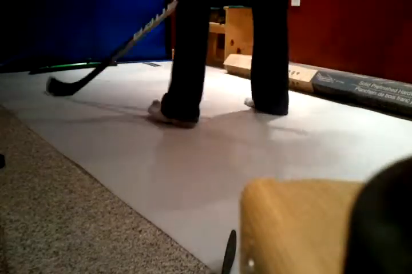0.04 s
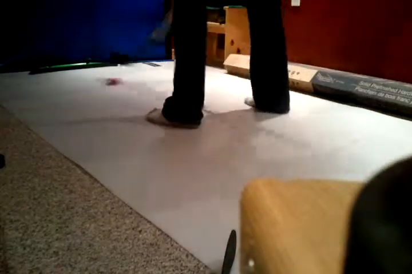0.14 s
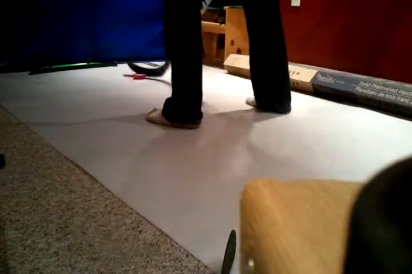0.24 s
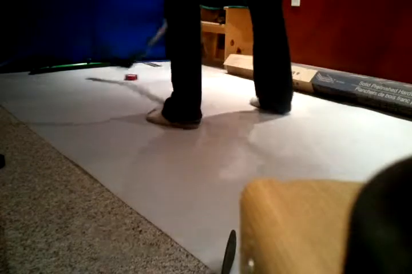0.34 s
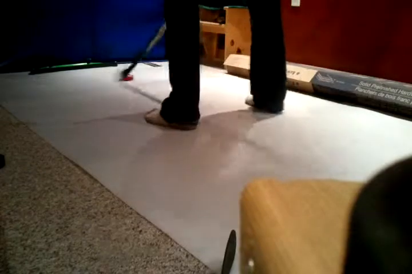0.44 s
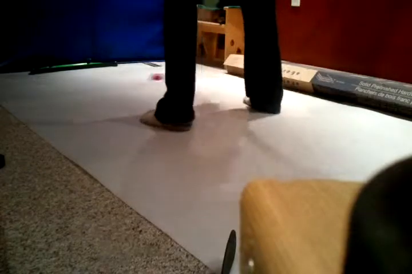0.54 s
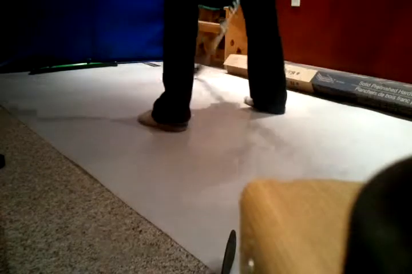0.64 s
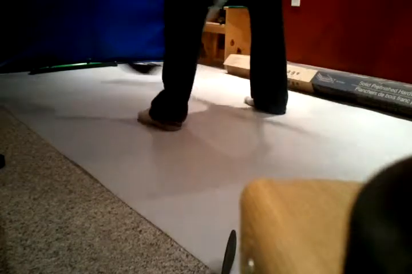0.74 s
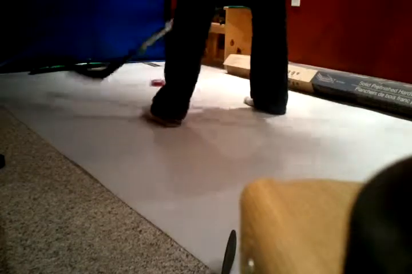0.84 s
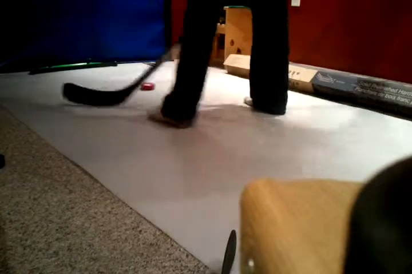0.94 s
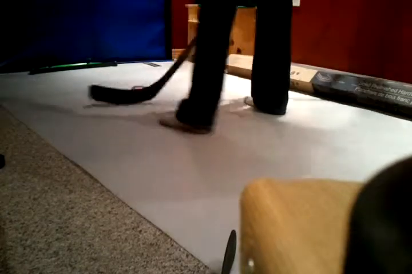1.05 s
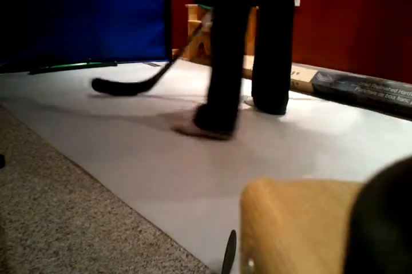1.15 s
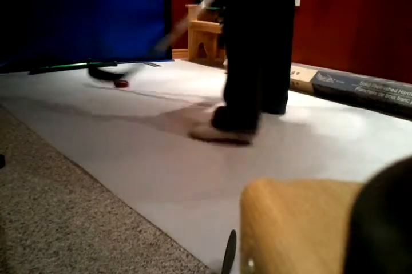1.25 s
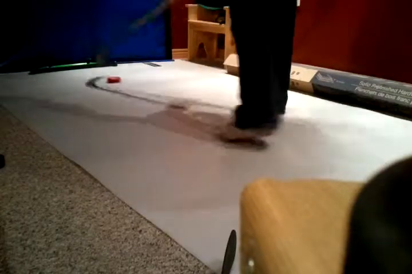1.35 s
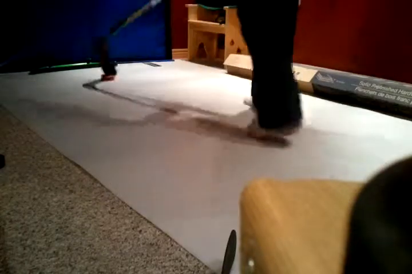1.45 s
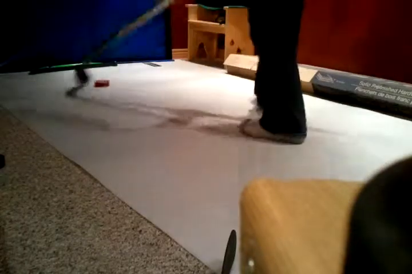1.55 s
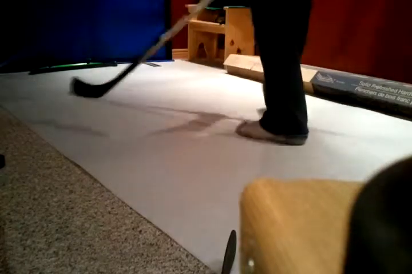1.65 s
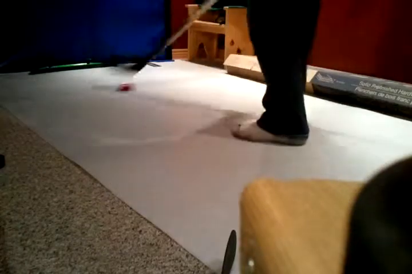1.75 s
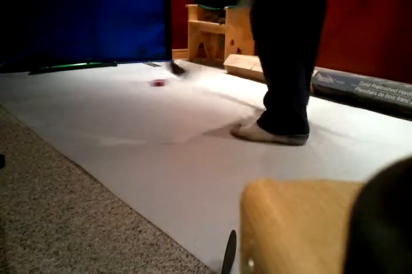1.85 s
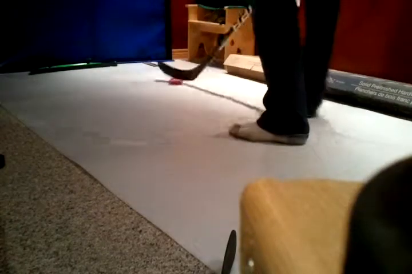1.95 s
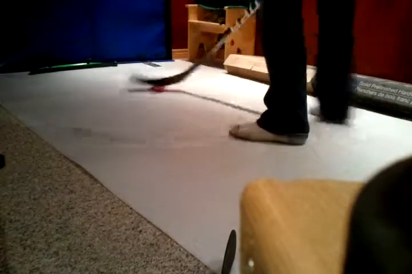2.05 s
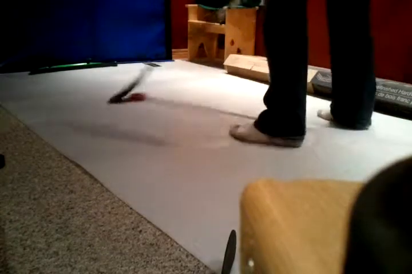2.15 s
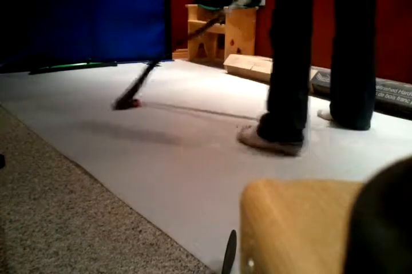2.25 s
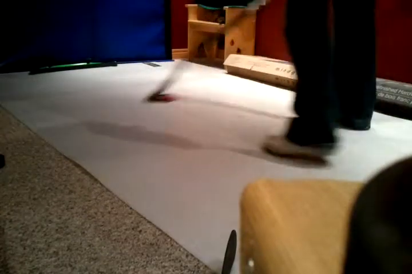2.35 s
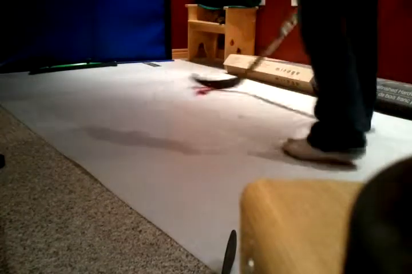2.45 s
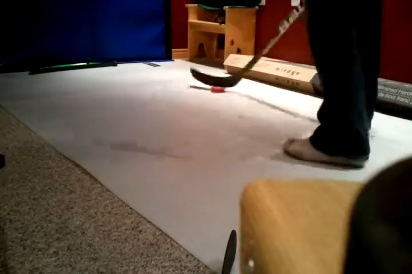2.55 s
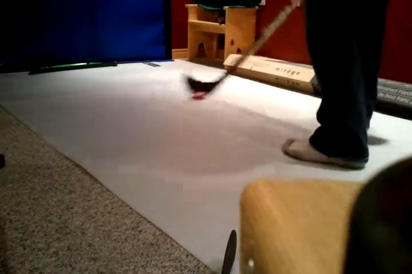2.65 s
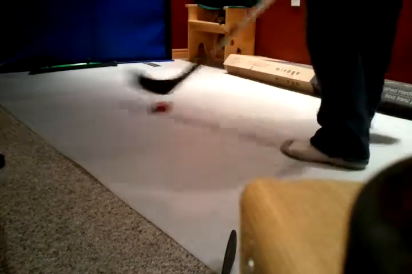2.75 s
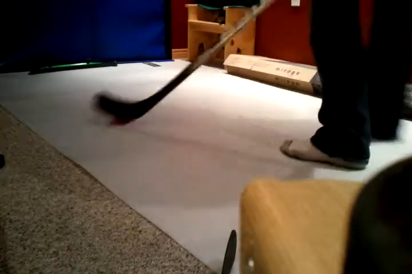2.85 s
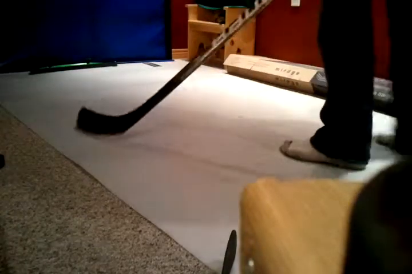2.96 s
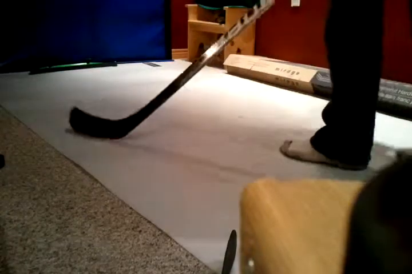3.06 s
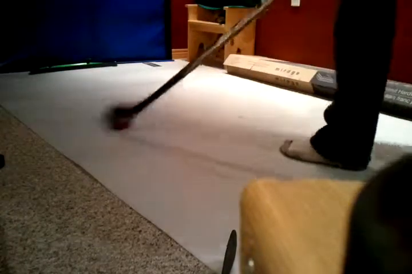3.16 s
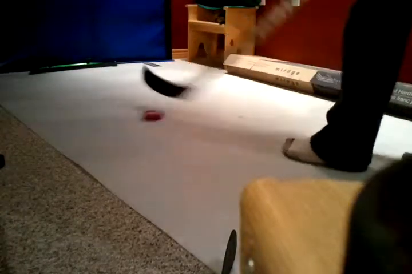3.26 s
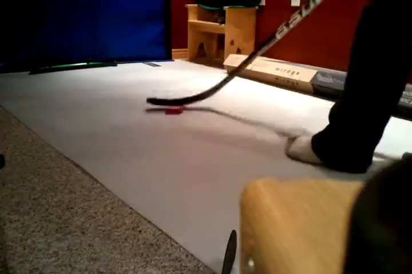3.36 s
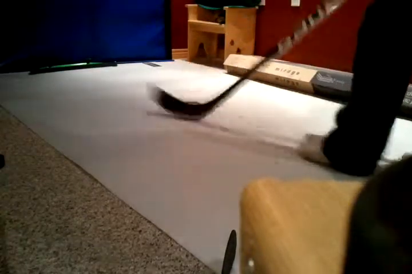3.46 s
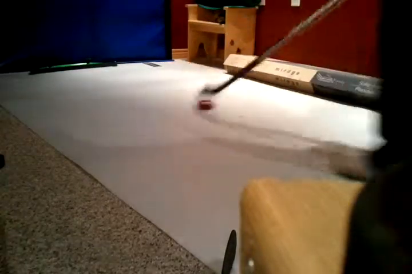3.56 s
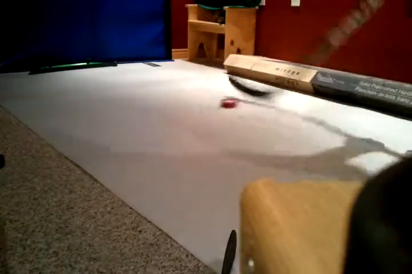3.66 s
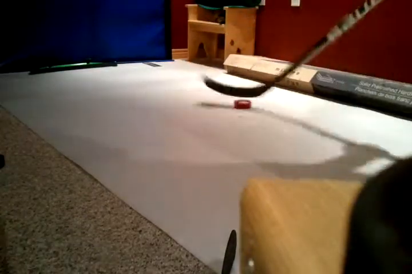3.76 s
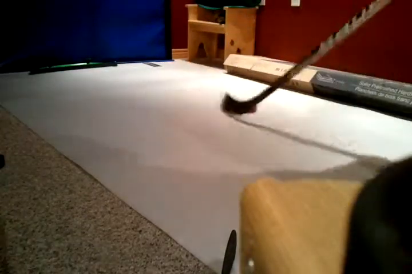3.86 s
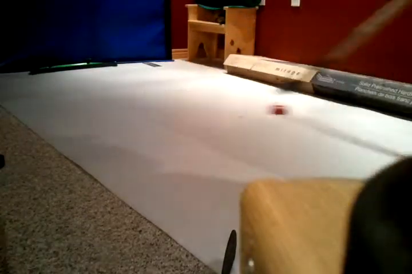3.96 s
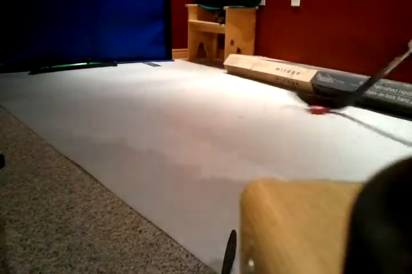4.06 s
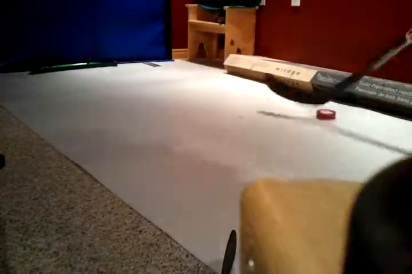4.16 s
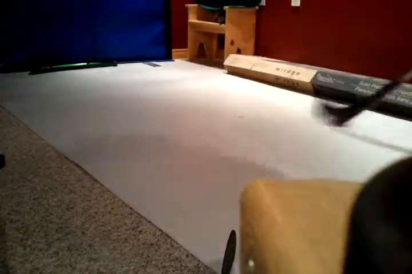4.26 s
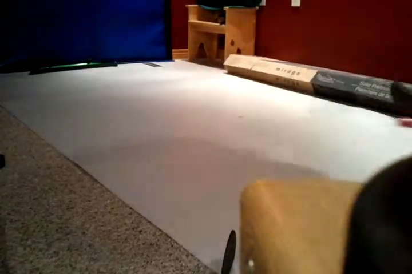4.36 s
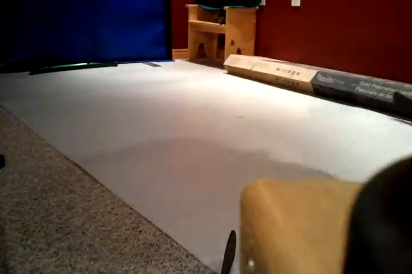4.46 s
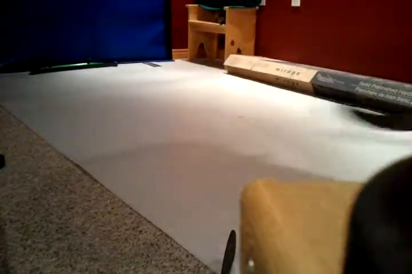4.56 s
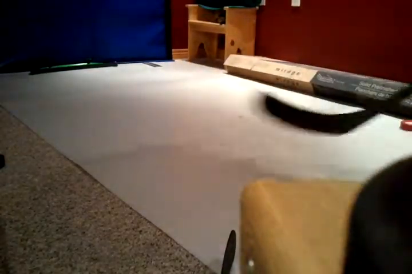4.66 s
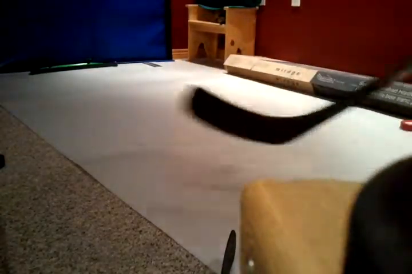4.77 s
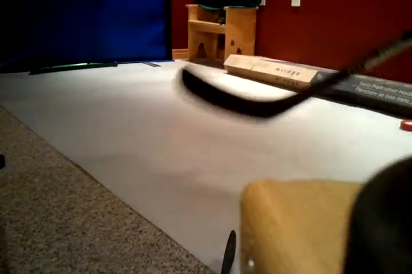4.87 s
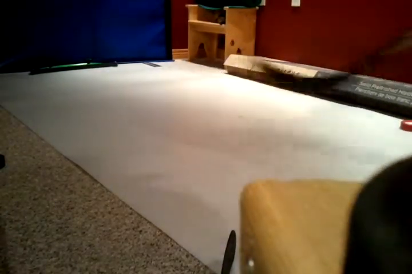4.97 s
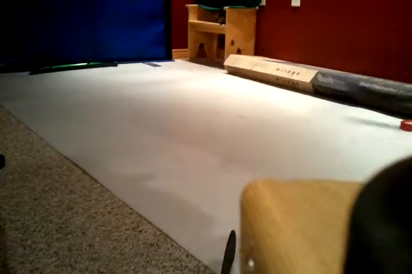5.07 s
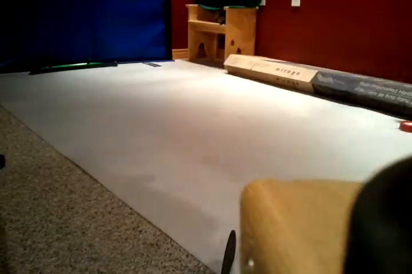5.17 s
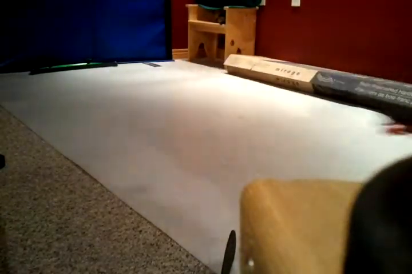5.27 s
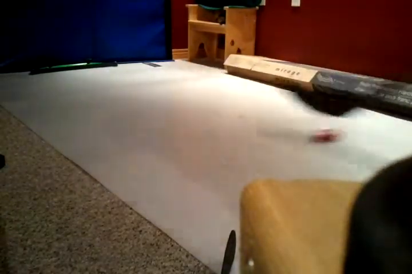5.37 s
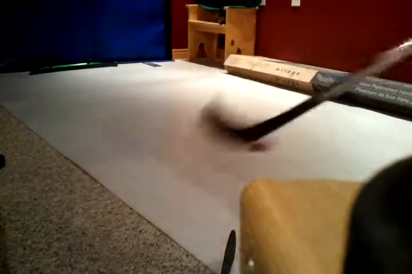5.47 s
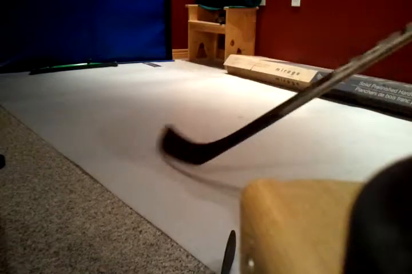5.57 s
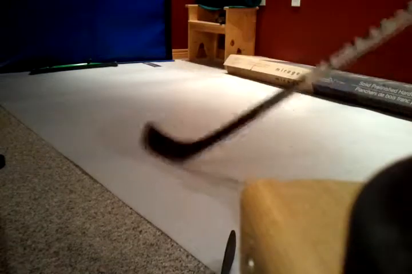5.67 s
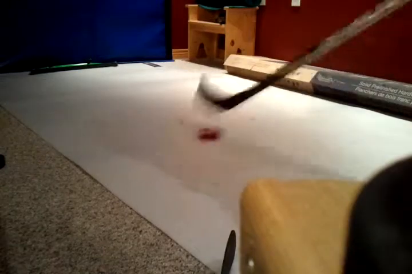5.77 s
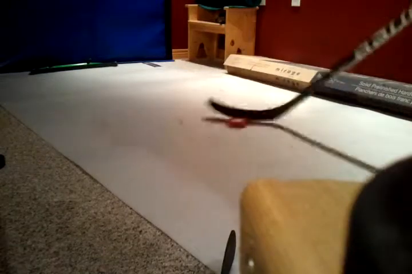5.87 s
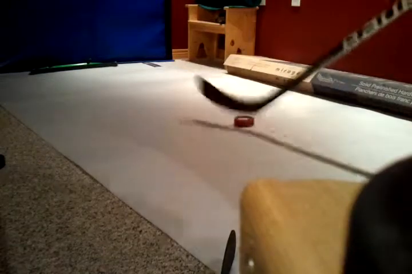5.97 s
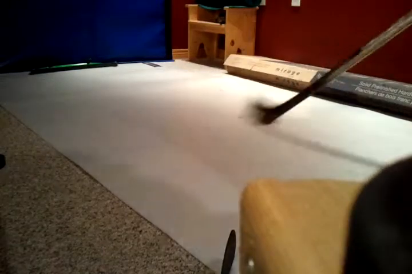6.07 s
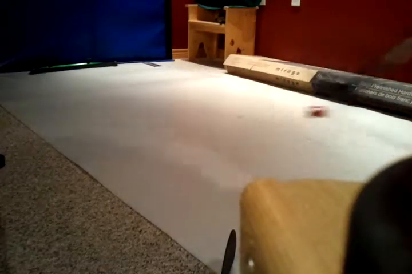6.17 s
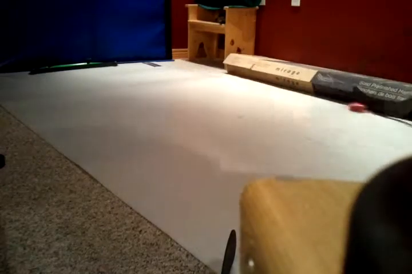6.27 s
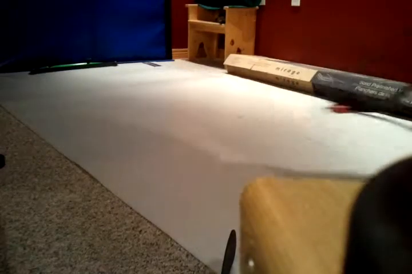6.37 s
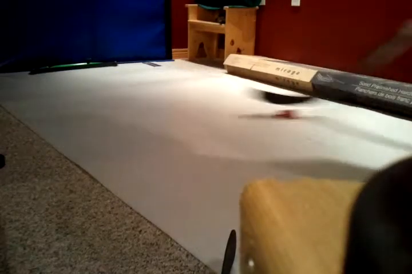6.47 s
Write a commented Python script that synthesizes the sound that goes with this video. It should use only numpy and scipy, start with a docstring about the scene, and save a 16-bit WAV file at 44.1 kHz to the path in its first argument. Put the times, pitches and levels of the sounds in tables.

```python
"""Stickhandling on a plastic shooting pad in a small, quiet basement room. From the start the blade thumps down
on the pad and clacks against the hard puck, which slides with a faint friction hiss. After two seconds hollow
knocks join in. Near five seconds it rests while the blade scrapes; then play resumes, and a loud knock ends it.
Throughout, the room reverberates after every blow, and the hardest ones overload a small microphone."""
import sys
import numpy as np
from scipy import signal
from scipy.fft import rfft, irfft
from scipy.io import wavfile
from scipy.ndimage import uniform_filter1d

SR = 44100
rng = np.random.default_rng(int(sys.argv[2]) if len(sys.argv) > 2 else 0)


def to_wav(sig):
    """Store sig (one row per channel, or 1-D mono) as 16-bit WAV at the path in sys.argv[1].

    Samples outside -1..1 are clipped; the rate is SR.
    """
    pcm = np.clip(np.atleast_2d(sig), -1, 1) * 32767
    pcm = np.round(pcm).astype(np.int16)
    wavfile.write(sys.argv[1], SR, pcm.T)  # frames by channels


N = 287973
BLOW_SAMPLES = 2 ** 15   # time for one blow to die away

# Spectral envelope of the taps and knocks. Each row: frequency in Hz, level in dB.
PAD_COLOUR = [(40, -13.5), (110, -8.5), (160, 9), (210, 11.5), (320, 11.5), (600, 4), (900, 1), (1800, 3.5),
              (3100, -1.5), (4200, 5), (5500, 5), (6600, -4.5), (8000, -10.5)]


def from_db(db):
    """Amplitude ratio: tenfold for every 20 dB."""
    return 10 ** (np.asarray(db) / 20)


def at_hz(points, hz):
    """Interpolation of (Hz, value) points on a logarithmic frequency axis."""
    frequencies, values = np.transpose(points)
    return np.interp(np.log(np.maximum(hz, 1)), np.log(frequencies), values)


def bins_hz(size):
    """Fourier analysis: the frequencies of a real FFT."""
    return np.arange(size // 2 + 1) * SR / size


def resonance(hz, centre, width):
    """Lorentzian resonance curve, 1 at its centre."""
    return 1 / (1 + (2 * (hz - centre) / width) ** 2)


def causal_filter(db):
    """Causality: a minimum-phase response of this shape and unit power gain, so nothing sounds early."""
    gain = from_db(db)
    cepstrum = irfft(np.log(gain / np.sqrt(np.mean(gain ** 2))))
    half = len(cepstrum) // 2
    cepstrum[1:half] *= 2
    cepstrum[half + 1:] = 0
    return np.exp(rfft(cepstrum))


def treble_loss(hz, edge_hz=7990, db_per_octave=170, depth_db=60):
    """Band limiting, in dB: the small microphone is nearly deaf above its edge."""
    return -np.minimum(db_per_octave * np.log2(np.maximum(hz / edge_hz, 1)), depth_db)


def steady_noise(colour):
    """Spectral shaping: white noise filtered to a given colour, rms 1."""
    hz = bins_hz(N)
    gain = from_db(at_hz(colour, hz) + treble_loss(hz))
    noise = irfft(rfft(rng.standard_normal(N)) * gain, N)
    return noise / np.std(noise)


def room_air(level_db=-46):
    """Ambient noise: the steady, low rush of a quiet room."""
    # Spectrum of the room's noise. Each row: frequency in Hz, level in dB.
    colour = [(15, -69), (25, -36), (114, -1), (266, -4.5), (300, -8), (382, -9), (590, -11.5), (635, -15),
              (1190, -21), (3280, -32), (5060, -27), (8000, -44), (10400, -68), (17600, -120)]
    return from_db(level_db) * steady_noise(colour)


def room_decay():
    """Absorption: overlapping frequency bands, and the exponential decay of each."""
    # Reverberation of the room. Each row: frequency in Hz, time to fall 60 dB in seconds.
    reverberation = [(100, 0.29), (220, 0.31), (500, 0.24), (1000, 0.22), (1800, 0.23), (3200, 0.25),
                     (5300, 0.25), (7500, 0.2)]
    t, hz = np.arange(BLOW_SAMPLES) / SR, bins_hz(BLOW_SAMPLES)
    centres, t60s = np.transpose(reverberation)
    bands = np.array([at_hz(np.c_[centres, row], hz) for row in np.eye(len(centres))])
    return bands, from_db(-60 * t / t60s[:, None])


def sliding(slide_db=-44.5, rest_from_s=4.92, rest_until_s=5.45, fade_s=0.2, grain_db=0.5):
    """Friction noise: the puck hisses over the scuffed pad unless at rest, and the blade scrapes."""
    # Spectrum of rubbing plastic. Each row: frequency in Hz, level in dB.
    colour = [(200, -22.5), (330, -13), (600, -6), (1000, -5.5), (2000, -9), (2800, -10.5), (3700, -11),
              (4700, -3.5), (5450, -1), (6300, -11), (8000, -17.5)]
    # Scrapes of the blade. Each row: midpoint in seconds, half length in seconds, level in dB.
    strokes = [(5.06, 0.14, -48.5), (5.16, 0.021, -47), (5.673, 0.042, -36)]
    t = np.arange(N) / SR
    moving = np.clip(np.maximum(rest_from_s - t, t - rest_until_s) / fade_s, 0, 1)
    scrapes = sum(from_db(db) * np.exp(-((t - s) / half_s) ** 2) for s, half_s, db in strokes)
    scuffs = uniform_filter1d(rng.standard_normal(N), size=300)
    grain = from_db(grain_db * scuffs / np.std(scuffs))
    return (from_db(slide_db) * moving + scrapes) * grain * steady_noise(colour)


def floor_thuds(taps, gain_db=2, reach_hz=60):
    """Free vibration: each tap sets the floor humming, favouring the modes near the pitch of its thump."""
    # Modes of the padded floor. Each row: frequency in Hz, time to fall 60 dB in seconds, level in dB.
    floor_modes = [(199.6, 0.42, -11), (249.2, 0.16, -11.5), (297, 0.34, -35)]
    out, t = np.zeros(N + BLOW_SAMPLES), np.arange(BLOW_SAMPLES) / SR
    for s, level_db, flat_db, thump_hz in taps:
        hum = sum(resonance(hz, thump_hz, reach_hz) * from_db(db - 60 * t / t60)
                  * np.cos(2 * np.pi * hz * t) for hz, t60, db in floor_modes)
        start = round(s * SR)
        out[start:start + BLOW_SAMPLES] += from_db(level_db + flat_db + gain_db) * hum
    return out[:N]


def snap_gain(s, level_db, room_radius_m=2.05):
    """Direct-to-reverberant ratio, in dB: light blows and near ones stand out more crisply."""
    # Path of the blade. Each row: time in seconds, distance from the microphone in metres.
    distances = [(0, 2.53), (2.1, 2.43), (3.0, 2), (3.55, 1.83), (4.15, 2.27), (4.55, 1.78), (5.5, 1.8),
                 (5.9, 2.05), (6.5, 2)]
    metres = np.interp(s, *np.transpose(distances))
    lightness_db = min(-0.52 * level_db, 9.5)
    return lightness_db + 20 * np.log10(room_radius_m / metres)


def contact(snap_db, decay, snap_s, rise_s=0.00039, echo_s=0.0085, echo_db=2, echo_decay_s=0.0087,
            build_s=0.0048, early_s=0.19):
    """Spectrum of an impact: direct burst, ceiling echo and diffuse reflections add in power and decay."""
    t = np.arange(BLOW_SAMPLES) / SR
    bands, envelopes = decay
    direct = from_db(snap_db) * np.exp(-t / snap_s) * (1 - np.exp(-t / rise_s))
    ceiling = from_db(echo_db) * (t > echo_s) * np.exp(-np.abs(t - echo_s) / echo_decay_s)
    bunches = uniform_filter1d(rng.standard_normal(BLOW_SAMPLES), size=60)   # early echoes cluster
    diffuse = (1 - np.exp(-t / build_s)) * from_db(bunches / np.std(bunches) * np.exp(-t / early_s))
    burst = rng.standard_normal(BLOW_SAMPLES) * np.sqrt(direct ** 2 + ceiling ** 2 + diffuse ** 2)
    return rfft(np.sum(irfft(rfft(burst) * bands) * envelopes, axis=0))


def uneven_modes(hz, spread_db=1.8):
    """Point of excitation: no two blows hit the same spot, so the upper modes vary at random, in dB."""
    ripple = uniform_filter1d(rng.standard_normal(len(hz)), size=110)
    ripple = uniform_filter1d(ripple, size=110)
    return spread_db * ripple / np.std(ripple) * at_hz([(400, 0), (1000, 1)], hz)


def tilt(hz, thump_db, body_db, slap_db):
    """Spectral balance, in dB: bass, low middle and treble against the blade's woody middle."""
    balance = [(290, thump_db), (520, body_db), (950, body_db), (1500, 0), (2400, 0.012), (3800, slap_db)]
    return at_hz(balance, hz)


def blows(events, colour, tone, crack_db, snap_s, gain_db):
    """Source and filter: each impact excites the modes of stick and puck; its landing sets the tone."""
    # Resonances of stick and puck. Each row: frequency in Hz, width in Hz, gain in dB.
    stick_modes = [(187, 26, -0.5), (451, 9, 3), (892, 153, 4.5), (1081, 25, 4.5), (1280, 31, 7.5),
                   (1710, 79, 4.5), (1935, 45, 2), (2100, 240, 2), (2620, 500, 1.5), (4030, 150, -4),
                   (4970, 290, 2.5), (5340, 79, 5)]
    out, hz, decay = np.zeros(N + BLOW_SAMPLES), bins_hz(BLOW_SAMPLES), room_decay()
    colour_db = at_hz(colour, hz) + treble_loss(hz)
    modes_db = sum(db * resonance(hz, centre, width) for centre, width, db in stick_modes)
    for s, level_db, *landing in events:
        snap_db = crack_db + snap_gain(s, level_db)
        shape_db = colour_db + tone(hz, modes_db, *landing) + uneven_modes(hz)
        sound = irfft(contact(snap_db, decay, snap_s) * causal_filter(shape_db))
        start = max(round(s * SR), 0)
        out[start:start + BLOW_SAMPLES] += from_db(level_db + gain_db) * sound
    return out[:N]


def hollow_knocks(hollow_db=12.5, hollow_q=0.98):
    """Heavily damped resonance: each knock sounds with one broad, hollow peak."""
    # Hollow knocks. Each row: start in seconds, level in dB, pitch in Hz, brightness in dB.
    knocks = [(2.3706, -33.5, 590, -1.5), (2.459, -22, 1700, -4), (3.1725, -25.5, 880, 2.5),
              (3.231, -32.5, 740, -17), (3.2799, -35.5, 950, -10), (3.6267, -27, 1400, -12.5),
              (4.6385, -10.5, 1290, -1.5), (4.652, -15, 474, -30.5), (5.41, -19.5, 397, -4),
              (6.322, -21.5, 1590, 2), (6.491, -8.5, 786, -0.5)]

    def tone(hz, modes_db, pitch_hz, bright_db):
        hollow = hollow_db * resonance(hz, pitch_hz, pitch_hz / hollow_q)
        return modes_db + hollow + tilt(hz, thump_db=-5, body_db=0, slap_db=bright_db)

    return blows(knocks, PAD_COLOUR, tone, crack_db=1.76, snap_s=0.0049, gain_db=0.3)


def blade_taps(boom_db=5, boom_width_hz=45):
    """Coupling to the floor: the flatter the blade lands on the pad, the more thump, body and slap."""
    # Taps on the pad. Each row: start in seconds, level in dB, flatness as dB of thump, thump in Hz.
    taps = [(0.2057, -8.5, 5, 213), (0.4628, -13.5, 2.5, 208), (0.6471, -9.5, 3.5, 178),
            (0.853, -12, 3, 222), (1.1879, -23.5, 4.5, 205), (1.6374, -12.5, -3, 202),
            (2.1147, -14.5, 3, 217), (2.6898, -21, 0, 258), (3.0857, -16.5, -9, 210),
            (3.5402, -13, 4.5, 204), (3.707, -16, 6, 207), (3.9181, -13.5, 4.5, 251),
            (4.0902, -14.5, 9, 261), (4.2757, -14, 2.5, 266), (4.4637, -11, 4, 262), (6.125, -14, 6, 243)]

    def tone(hz, modes_db, flat_db, thump_hz):
        boom = boom_db * resonance(hz, thump_hz, boom_width_hz)
        return modes_db + boom + tilt(hz, flat_db, body_db=0.73 * flat_db, slap_db=0.58 * flat_db)

    return blows(taps, PAD_COLOUR, tone, crack_db=2.6, snap_s=0.0041, gain_db=-0.16) + floor_thuds(taps)


def puck_clacks(ring_db=8.5, ring_width_hz=160):
    """Modal excitation: where the puck hits, one ring stands out; clear of the pad the blade is woody."""
    # Hits on the puck. Each row: start in seconds, level in dB, flatness as dB of thump, ring in Hz.
    clacks = [(0, -12.5, 7.5, 2250), (0.2453, -3.5, 2.5, 1380), (0.4818, -6.5, 2.5, 1640),
              (0.6978, -4, -12, 1720), (0.8984, -5.5, 1, 900), (1.3848, -2, -3.5, 1700),
              (1.6816, -6.5, -11, 1880), (1.925, -2, -2, 1390), (2.1779, -7, -3.5, 870),
              (2.7571, -10, 7.5, 1260), (2.8759, -34, -10, 1770), (3.7788, -7.5, -15.5, 1690),
              (3.9699, -9.5, 8.5, 1530), (4.1455, -4.5, -4.5, 1320), (4.3101, -8, 5, 1000),
              (4.4947, -9.5, -5, 1280), (4.6658, -4, -11, 1680), (5.4157, -18.5, -10.5, 910),
              (5.5101, -11.5, 4, 1850), (5.8661, -7.5, 6, 1140), (6.1589, -7.5, 9, 1300),
              (6.2881, -7, 12, 1600)]
    # Spectral envelope of a clack. Each row: frequency in Hz, level in dB.
    colour = [(40, -20.5), (110, -24), (160, -11.5), (210, -2.5), (320, -4.5), (600, -3.5), (900, -3),
              (1800, -2), (3000, -5), (4200, -1), (5500, 0), (6600, -8), (8000, -14)]

    def tone(hz, modes_db, flat_db, ring_hz):
        rings = np.maximum(modes_db, ring_db * resonance(hz, ring_hz, ring_width_hz))
        return rings + tilt(hz, flat_db, body_db=0.28 * flat_db, slap_db=0.23 * flat_db)

    return blows(clacks, colour, tone, crack_db=1.85, snap_s=0.0053, gain_db=0.29)


def scene():
    """Superposition: taps, clacks, knocks and sliding add to the quiet of the room in one channel."""
    return (blade_taps() + puck_clacks() + hollow_knocks() + sliding() + room_air())[None]


def record(dry, full_scale=0.8, hardness=8, cutoff_hz=16000):
    """Saturation: the input overloads on the hardest blows; the top treble is rounded off, then cut."""
    clipped = dry / (1 + np.abs(dry / full_scale) ** hardness) ** (1 / hardness)
    rounded = signal.sosfiltfilt(signal.butter(1, 15000, fs=SR, output="sos"), clipped)
    return signal.sosfiltfilt(signal.ellip(8, .05, 50, cutoff_hz, fs=SR, output="sos"), rounded)


dry = scene()
out = record(dry)
to_wav(out)
```